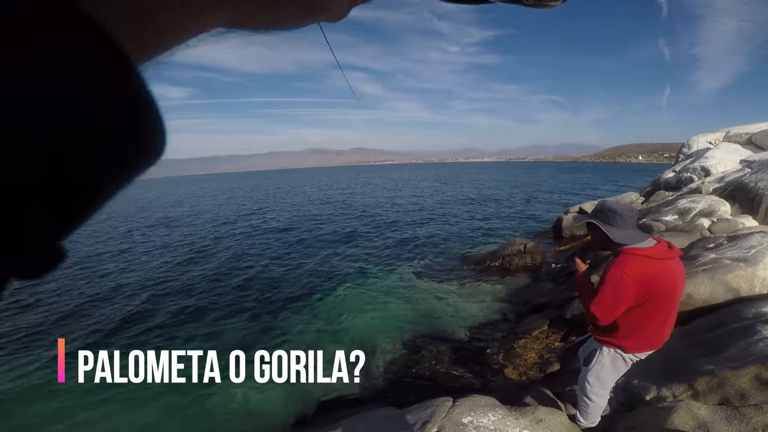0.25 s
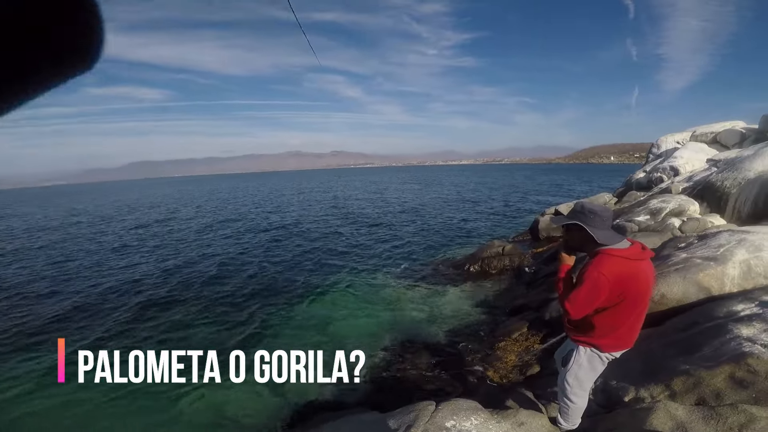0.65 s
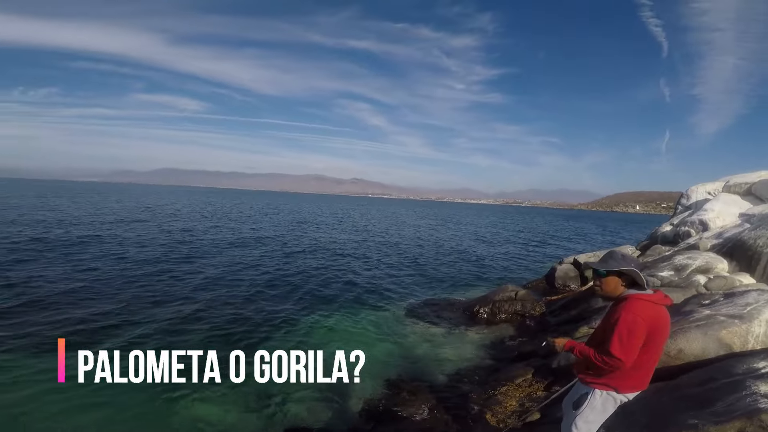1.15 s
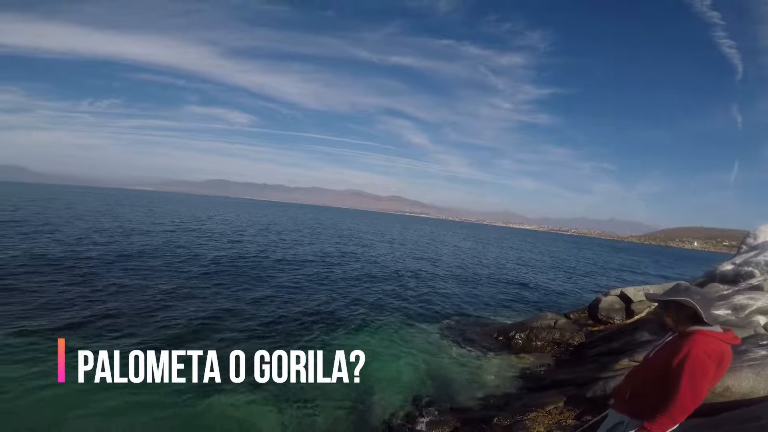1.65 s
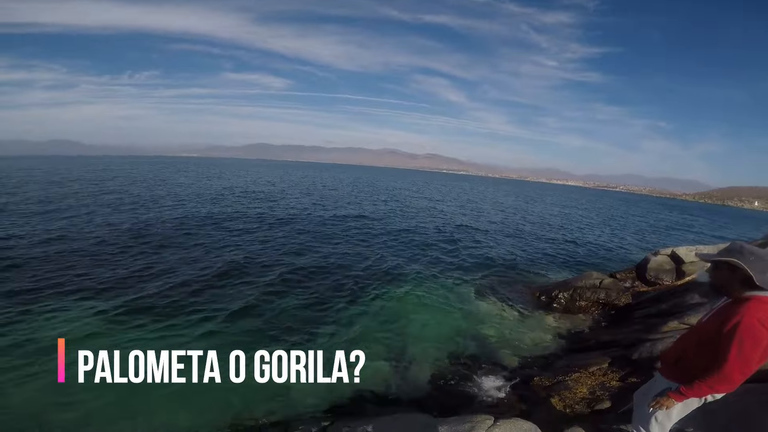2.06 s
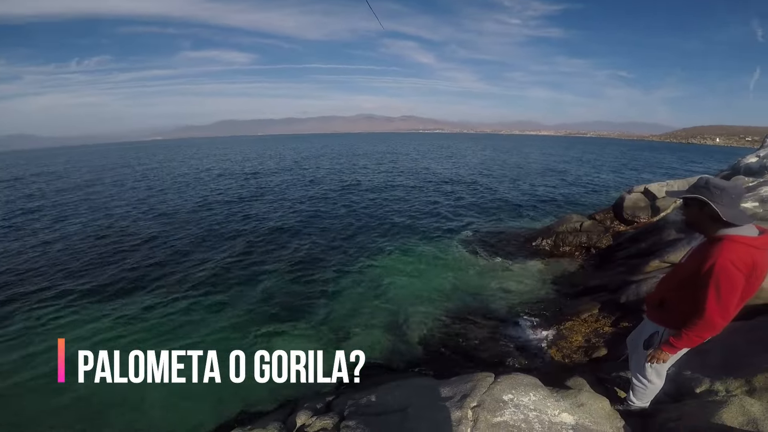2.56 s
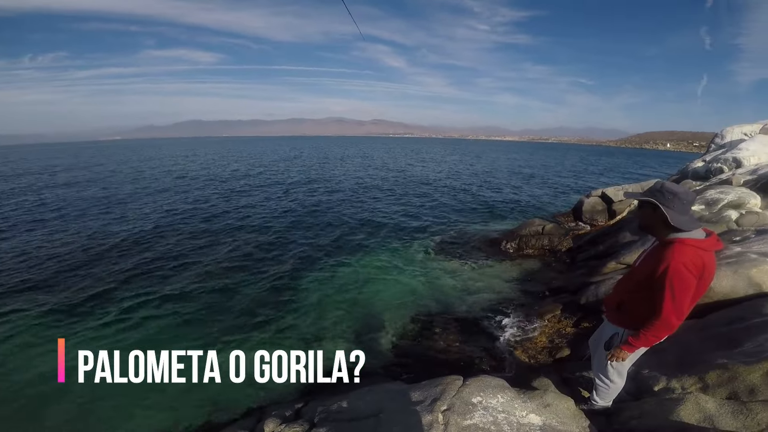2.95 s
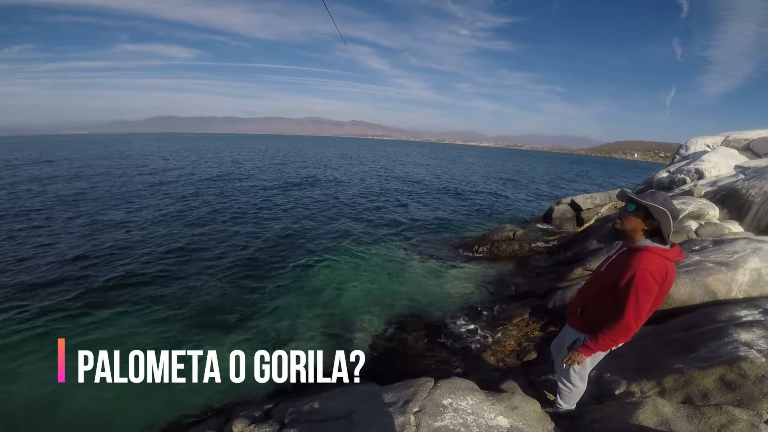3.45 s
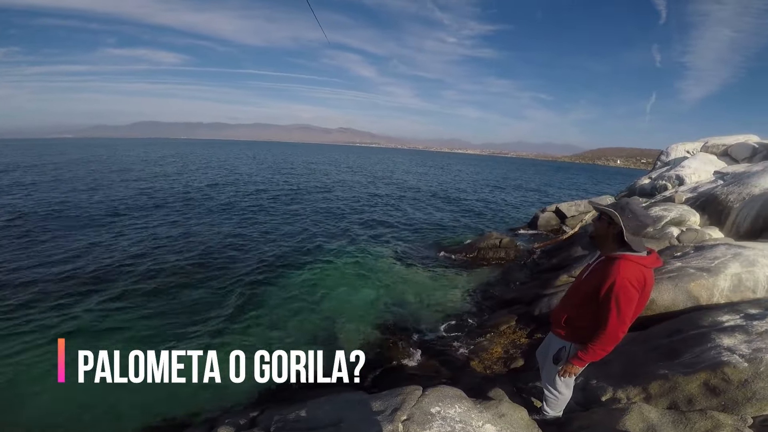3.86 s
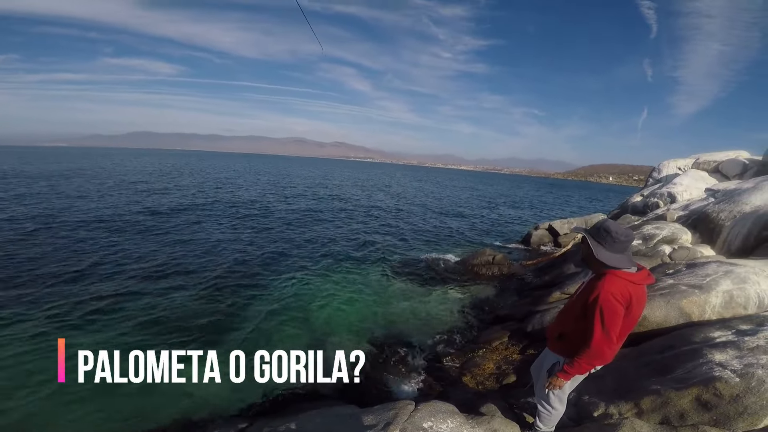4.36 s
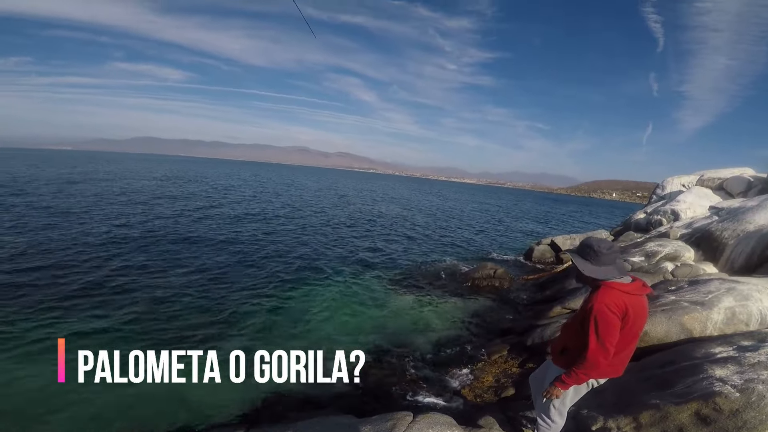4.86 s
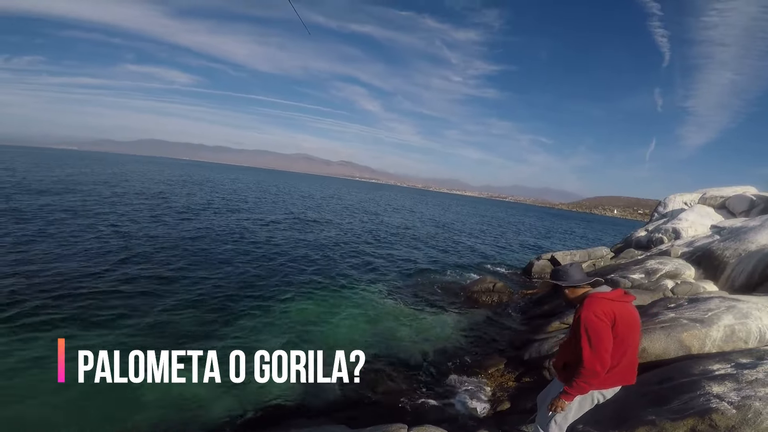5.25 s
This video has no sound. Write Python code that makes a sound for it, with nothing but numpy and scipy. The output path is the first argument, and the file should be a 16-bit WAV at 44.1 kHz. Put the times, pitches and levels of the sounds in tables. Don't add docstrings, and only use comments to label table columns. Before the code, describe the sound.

A fishing reel clicker buzzes as line is dragged out, ticks sporadically, then buzzes long again over gusty wind rumble and washing sea.

```python
import sys
import numpy as np
from scipy import signal
from scipy.fft import rfft, irfft, next_fast_len
from scipy.io import wavfile
from scipy.ndimage import uniform_filter1d

SR = 44100
rng = np.random.default_rng(int(sys.argv[2]) if len(sys.argv) > 2 else 0)


def natural_amplitude(level_db):
    exponent = np.asarray(level_db, float) / 20
    return 10 ** exponent


def wav_out(sig):
    wavfile.write(sys.argv[1], SR, np.round(np.clip(np.atleast_2d(sig).T, -1, 1) * 32767).astype(np.int16))


N = 242972
TIME = np.arange(N) / SR
EARS = np.array([[1], [-1]])
TEETH = 18
EVEN_BELOW_HZ = 6800


def unit(x):
    return x / np.sqrt(np.mean(x ** 2))


def curves(table):
    s, *columns = np.transpose(table)
    return [np.interp(TIME, s, c) for c in columns]


def humps(table):
    return sum(size * np.clip(1 - np.abs(TIME - s) / half_s, 0, 1) for s, size, half_s in table)


def walk(rate_hz, channels=2):
    k = int(SR / rate_hz)
    held = np.repeat(rng.standard_normal((channels, N // 200)), k, axis=1)[:, :N]
    return 2.53 * uniform_filter1d(uniform_filter1d(held, k), k)


def colour(x, points):
    hz, db = np.transpose(points)
    size = next_fast_len(N)
    log_hz = np.log(np.arange(size // 2 + 1) * SR / size + 1e-3)
    gain_db = np.interp(log_hz, np.log(hz), db, left=-90, right=-90)
    return irfft(rfft(x, size) * natural_amplitude(gain_db), size)[..., :N]


def low_pass(x, hz):
    return signal.sosfilt(signal.butter(3, hz, fs=SR, output="sos"), x)


def band_pass(x, order, band_hz):
    return signal.sosfilt(signal.butter(order, band_hz, "band", fs=SR, output="sos"), x)


def ring(pulses, hz, t60_s, lag_rad=0, pan_db=0):
    pole = np.exp(2j * np.pi * hz / SR - np.log(1000) / (t60_s * SR))
    z = signal.lfilter([1], [1, -pole], pulses)
    return np.array([z.imag, (z * np.exp(-1j * lag_rad)).imag]) * natural_amplitude(EARS * pan_db / 2)


def place(s, size):
    pulses, at = np.zeros(N + 1), np.clip(np.asarray(s) * SR, 0, N - 1)
    whole = at.astype(int)
    np.add.at(pulses, whole, size * (1 - at + whole))
    np.add.at(pulses, whole + 1, size * (at - whole))
    return pulses[:N]


# start_s, level_db
WASH = [(0, -53.5), (.75, -49.5), (1.1, -44), (1.65, -42), (2.2, -43.5), (4.4, -43), (4.62, -35),
        (5.2, -35.5), (5.51, -39)]
# freq_hz, level_db_per_hz
SEA_MID = [(410, 12.5), (700, 12), (994, 3), (1280, 7), (1390, 6), (1840, 4.5), (3660, -3.5), (4880, -11),
           (6600, -15.5), (14000, -29.5)]
SEA_SIDE = [(410, -7.5), (700, -4.5), (774, -8), (1450, -9.5), (1640, -17), (1790, -14.5), (4590, -29),
            (7200, -32), (14000, -49)]
# centre_s, gain_db, half_length_s
SLEEVE = [
    (0, 35.5, 0.97),
    (1.47, -1, 0.052),
    (1.92, 14, 0.24),
    (2.33, 13.5, 0.23),
]


def wash():
    swell_db, stroke_db = curves(WASH)[0], humps(SLEEVE)
    ducked = np.interp(TIME, [2.4, 2.5, 4.4, 4.6], [0, 1, 1, 0])
    sea_db = swell_db + 0.62 * stroke_db * (TIME > 1) + 2.0 + 1 * ducked
    rustle_db = swell_db - 8.5 + stroke_db - 22 * ducked + 1.0
    mid, side = (unit(colour(rng.standard_normal(N), shape)) for shape in (SEA_MID, SEA_SIDE))
    flicker = natural_amplitude(1.3 * walk(18))
    sea = (mid + EARS * side) * natural_amplitude(sea_db) * flicker
    grains = rng.standard_normal((2, N)) * natural_amplitude(2.5 * walk(150))
    rustle_shape = [(2500, 5.5), (4500, 1.5), (7000, 11.0), (9000, -0.5), (13500, -15)]
    return sea + unit(colour(grains, rustle_shape)) * natural_amplitude(rustle_db)


# start_s, strength_db, turbulence_db, left_minus_right_db
WIND = [(0.0, -26.5, 12, -4.5), (0.2, -31, -1, -3.5), (0.75, -28, 0, 0.5), (1.0, -21.5, -0.5, -2.5),
        (1.24, -27, 7, -2.5), (1.47, -22.5, -3.5, -1), (1.7, -20.5, -1.5, -1.5), (1.93, -26.5, 9.5, -3),
        (2.1, -18, -3, 5.5), (2.35, -21.5, 2.5, -1), (2.6, -16, -0.5, 4), (2.99, -23.5, -7.5, 0.5),
        (3.45, -21.5, 1, 2.5), (3.9, -16.5, 7, 8), (4.3, -22, 2.5, 1), (4.6, -15.5, 7.5, -11),
        (5.1, -9, -9.5, -13), (5.51, -22.5, -11.5, -2.5)]
# centre_s, gain_db, half_length_s
PUFFS = [(0.52, 6, 0.025), (0.89, 15.5, 0.016), (1.05, 2, 0.055), (1.33, -2, 0.027), (1.4, 6.5, 0.17),
         (1.5, 5.5, 0.058), (2.01, 6, 0.077), (2.19, 5.5, 0.037), (2.47, 1.5, 0.044), (2.8, 7, 0.02),
         (3.22, -9, 0.027), (3.26, 5, 0.034), (3.54, 6.5, 0.017), (3.68, -9, 0.067), (3.77, 0.5, 0.048),
         (4.05, -0.5, 0.039), (4.44, 8.5, 0.068), (4.53, 0, .04), (4.64, 1.5, 0.077), (4.86, 7.5, 0.039),
         (4.93, -2.5, .04), (5.26, 13, 0.02), (5.13, -1, 0.023), (1.22, -2.5, 0.046), (4.26, -1.5, 0.043),
         (3.2, -1.5, .03)]
# centre_s, gain_db, half_length_s
SWIRLS = [(.15, -10, 0.093), (.4, 4, 0.18), (.87, -21, 0.043), (1.25, 8, 0.045), (1.34, -5, 0.016),
          (1.48, 11, 0.052), (1.62, 0, .04), (1.81, 12, 0.041), (2.195, -16, 0.018), (2.36, -5, 0.062),
          (2.97, 4, .08), (3.12, 8, 0.082), (3.62, -8, 0.1), (4.12, 2.5, 0.054), (4.3, 7, 0.055),
          (4.75, 0, 0.087), (4.97, -22, 0.074)]
# freq_hz, level_db_per_hz
EDDY = [(11, -40), (18, -0.5), (59, 1.5), (107, -0.5), (274, -9.5), (432, -17.5), (584, -20), (635, -31),
        (1000, -23.5), (1300, -60), (2200, -120)]


def wind():
    strength_db, turbulence_db, pan_db = curves(WIND)
    puff_db = humps(PUFFS)
    turbulence_db = turbulence_db + humps(SWIRLS)
    rumble_db = strength_db + puff_db
    buffet_db = -7 + 0.64 * turbulence_db + 0.36 * puff_db
    flutter_db = -17.5 + turbulence_db + 0.44 * puff_db
    gust = 1.5 * np.tanh(walk(22.163) / 1.5)
    # low_hz, high_hz, level_db, shared gust_db, each port's own_db
    bands = [(16.0, 126.0, 0.011, 1.5, 1.74),
             (113.5, 390, buffet_db, 3.6, 1.45),
             (307.0, 834, flutter_db, 4, 5.0)]
    out = 0
    for low_hz, high_hz, level_db, gust_db, own_db in bands:
        eddies = colour(rng.standard_normal((2, N)), EDDY)
        band = unit(band_pass(eddies, 2, (low_hz, high_hz)))
        out = out + natural_amplitude(level_db) * unit(band * natural_amplitude(gust_db * gust + own_db * walk(35)))
    return out * natural_amplitude(rumble_db + 1.0 + EARS * pan_db / 2)


# start_s, peak_db, pitch_hz, left_minus_right_db
SLAPS = [(1.432, -2.5, 276, 2), (1.72, -13, 285, -4), (1.895, -22, 505, 7), (2.287, -2.5, 526, 4),
         (2.325, -11, 565, 2), (2.39, -14, 610, 5), (2.5, -9, 285, -10.5), (3.808, -7, 274, 2),
         (4.427, -20, 255, -13), (4.647, -11, 686, 8.5), (4.728, -3.5, 340, -5), (4.847, -11.5, 376, 9),
         (5.064, -11, 759, 4), (5.257, -13.5, 250, 5)]
# start_s, peak_db, pitch_hz
KNOCKS = [
    (1.051, -34, 1820),
    (1.321, -20, 1820),
    (1.3617, -22, 1500),
    (1.405, -25, 1440),
    (1.7193, -25.5, 1750),
    (1.9017, -47, 1600),
]


def handling():
    slaps = sum(ring(place([s], natural_amplitude(db)), hz, 9.0 / hz, 1.32, pan) for s, db, hz, pan in SLAPS)
    knocks, knock_t60_s = 0, .014
    for s, db, hz in KNOCKS:
        rod = ring(place([s], natural_amplitude(db + 13)), hz, knock_t60_s, 2.54)
        seat = ring(place([s], natural_amplitude(db + 6.5)), 1.26 * hz, knock_t60_s, 2.3)
        knocks = knocks + rod + seat
    return low_pass(slaps, 830) + low_pass(knocks, 2100)


# centre_s, speed_lost_share, half_length_s
BINDS = [(.055, .12, .035), (.165, .12, .035), (2.52, .25, .065), (2.662, .2, .04), (2.797, .17, .04),
         (2.932, .28, .052), (3.062, .23, .04), (3.185, .18, .05), (3.315, .13, .04), (3.6, .08, .045),
         (3.68, .07, .04), (3.745, .13, .045), (3.835, .12, .05), (3.872, .06, .035), (3.91, .13, .045),
         (4.0, .1, .03), (4.085, .12, .03), (4.17, .21, .04), (4.255, .08, .05), (4.54, .05, .05)]


def teeth(run):
    rate = curves(run)[0] * (TIME >= run[0][0]) * (TIME < run[-1][0])
    rate *= 1 - humps(BINDS)
    rate *= 1 + .016 * np.sin(4 * np.pi * np.cumsum(rate) / SR / TEETH)
    turns = np.cumsum(rate) / SR / TEETH
    wobble = .03 * (TIME < 1) + .035 * np.clip((TIME - 3.3) * 10, 0, 1)
    fastest_s = 3.53
    rate *= 1 + wobble * np.cos(2 * np.pi * (turns - turns[int(fastest_s * SR)]))
    passed = np.cumsum(rate) / SR
    at = np.flatnonzero(np.diff(np.floor(passed))) + 1
    uneven = .009 * rng.standard_normal(N // 50)[:len(at)]
    return TIME[at] + (uneven - passed[at] % 1) / rate[at], rate[at]


def worn(count):
    turn = 2 * np.pi * np.arange(count) / TEETH
    return natural_amplitude(1.6 * np.sin(turn) + 2.4 * np.sin(2 * turn + 1))


def clicker(s, size, snap, modes, modes_db, snap_s, alike, scatter_db, clean_db, damped_s=9, vary=0.3):
    chance = rng.standard_normal((len(s), len(modes) + 1)).T
    blows = place(s, size * natural_amplitude(scatter_db * chance[-1]))
    release = 30 * uniform_filter1d(blows, size=30, origin=14)
    burst = signal.lfilter([1], [1, -np.exp(-1 / (snap_s * SR))], release)
    common, *own = rng.standard_normal((3, N))
    alike = np.clip(alike, 0, 1)
    noise = np.sqrt(alike) * common + np.sqrt(1 - alike) * np.array(own)
    hiss_shape = [(500, -20), (5000, -17), (6500, -6), (7500, 0), (20000, 0)]
    hiss = natural_amplitude(-27) * colour(burst * noise, hiss_shape)
    knock = natural_amplitude(clean_db) * low_pass(place(s, size), EVEN_BELOW_HZ)
    out = colour(hiss + knock, snap) / np.std(colour(common, snap))
    for c, (hz, db, t60_s, lag_rad, pan_db) in zip(chance, modes):
        strike = np.cbrt(c) if hz > EVEN_BELOW_HZ else 1 + c * vary
        mode = ring(place(s, size * strike), hz, min(t60_s, damped_s), lag_rad, pan_db)
        out = out + natural_amplitude(db + modes_db) * mode
    return out


# start_s, teeth_per_s
RUN_LONG = [(2.405, 152), (2.45, 262), (2.59, 380), (2.73, 432), (3.01, 416), (3.26, 414), (3.47, 436),
            (3.51, 503), (3.955, 500), (4.03, 468), (4.32, 442), (4.35, 385), (4.41, 372), (4.45, 308),
            (4.655, 302), (4.75, 222), (4.88, 216), (4.974, 168)]
# start_s, teeth_passed
COAST_OUT = [(4.9778, 0), (5.0027, 4), (5.0361, 9), (5.0711, 14), (5.1005, 18), (5.1244, 21), (5.1723, 27),
             (5.2062, 31), (5.2402, 35), (5.2791, 39), (5.3105, 42), (5.3439, 45), (5.3833, 48),
             (5.4103, 50), (5.4412, 52), (5.4746, 54), (5.5095, 56)]
# freq_hz, level_db_per_hz
SNAP_SHELTERED = [(1470, -50), (2500, -33), (2980, -44), (4470, -2), (5100, -2), (5700, 8), (6100, -1),
                  (6710, -43), (8380, -37), (9320, -3.5), (10300, -16.5), (12200, -6), (13700, -24),
                  (14800, -15), (15600, -15)]
# pitch_hz, level_db, t60_s, right_lag_rad, left_minus_right_db
SPOOL_SHELTERED = [(3940, -7, 0.078, 0, 0), (4370, 2, 0.014, 0, -1.5), (4700, -3, 0.021, -0.5, -0.5),
                   (7390, -12, 0.06, 0, 0), (5610, -3, 0.013, 0.5, 1), (9500, -4, 0.0091, -0.5, 0),
                   (10800, -14, 0.014, 1, 0), (12100, 1, 0.006, 3, -7), (14650, 7, 0.0076, 1.5, 14)]


def reel_sheltered():
    s, rate = teeth(RUN_LONG)
    rise = np.clip((s - 4.0) / 0.13, 0, 1)
    fast = worn(len(s)) * rise * natural_amplitude(-41.5 + 2.0) * np.sqrt(300 / rate)
    when_s, passed = np.transpose(COAST_OUT)
    tick_s = np.interp(np.arange(passed[-1]), passed, when_s) + 0.0016
    last = natural_amplitude(-35.0) * np.ones(len(tick_s))
    return clicker(np.r_[s, tick_s], np.r_[fast, last], SNAP_SHELTERED, SPOOL_SHELTERED, modes_db=0.33,
                   snap_s=.002, alike=1.0, scatter_db=1.6, clean_db=11.0, damped_s=.06, vary=1.0)


def coast(start_s, gap_s, growth, count):
    gaps = gap_s * growth ** np.arange(count) * (1 + .03 * rng.standard_normal(count))
    return start_s + np.cumsum(gaps) - gaps[0]


# start_s, peak_db, spool_ring_db
TICKS = [(0.6435, -13, -20), (0.6648, -12.5, -23), (0.692, -13, -15), (0.7164, -10, -41), (0.75, -8, -16.5),
         (0.8287, -11, -12.5), (1.429, -15, -21), (1.4635, -14.5, -6), (1.4951, -12.5, -11),
         (1.5217, -9, -35), (1.555, -10.5, -37), (1.59, -13, -21), (1.623, -13.5, -6.5),
         (1.952, -10.5, -24), (1.9979, -9, -19), (2.025, -10.5, -34), (2.044, -11, -33), (2.064, -8, -32),
         (2.093, -9.5, -26), (2.1992, -42, -1), (2.28, -12.5, -18), (2.294, -36, -23), (2.314, -14, -30),
         (2.3296, -10, -21)]


def slow_teeth():
    rows = [np.transpose(TICKS)]
    run_down = coast(start_s=.5317, gap_s=.0072, growth=1.06, count=11)
    start_up = coast(start_s=2.3423, gap_s=.008, growth=1.02, count=8)
    for s, db, ring_db in ((run_down, -10, -18), (start_up, -11.5, -28)):
        chance = rng.standard_normal((len(s), 2)).T
        rows.append([s, db + 2.3 * chance[0], ring_db + 6 * chance[1]])
    return np.concatenate(rows, axis=1)


# low_hz, high_hz
HOUSING_HZ = [
    (1300, 1640),
    (1170, 1800),
]


def housing(push):
    flutter = natural_amplitude(4.5 * np.tanh(walk(45, channels=1)[0] / 2))
    out = 0
    for band_hz, grip in zip(HOUSING_HZ, (TIME < 1, TIME >= 1)):
        body = band_pass(push * grip * flutter, 4, band_hz)
        out = out + np.array([body, 0.41 * np.roll(body, 10)])
    return out


# start_s, teeth_per_s
RUN_OUT = [(0.0, 345), (0.085, 392), (0.13, 386), (0.23, 258), (0.29, 190), (0.365, 250), (0.43, 176),
           (0.5, 198), (0.529, 150)]
# level_db, spool_ring_db, housing_db
GRIPS = [
    (-24, -11.5, 2.5),
    (-25.5, -16.5, -4),
]
# centre_s, gain_db, half_length_s
RIM_FREE = [(0.154, 8, 0.084), (0.55, 0.5, 0.28), (2.45, 2, 0.15), (2.85, 7.5, 0.23), (3.08, -4, 0.1),
            (3.23, 6.5, 0.05), (3.39, -3, 0.073), (3.5, 12, 0.06), (3.78, 3, 0.028)]
# centre_s, gain_db, half_length_s
HUM = [(.03, -4, 0.045), (.11, -3, .04), (.21, 11, 0.014), (.31, 5.5, 0.037), (.42, -2, 0.073),
       (.47, 5, 0.021), (.56, 0, .06), (2.43, -3, .06), (2.57, 2, 0.043), (2.76, 2.5, .04), (2.82, 1, .03),
       (2.92, 2.5, .05), (3.08, 1, 0.037), (3.5, 0.5, 0.053), (3.68, -1, .05), (3.87, -11, 0.054)]
# freq_hz, level_db_per_hz
SNAP = [(1180, -7.5), (2000, -7.5), (2510, -11), (3660, -2), (3820, -4.5), (4140, -39), (4970, -14),
        (5500, 0), (7260, 1.5), (8210, -4), (9370, 0), (11400, -14), (14800, -34), (22000, -120)]
SNAP_EDGE = [(11750, -8)]
# pitch_hz, level_db, t60_s, right_lag_rad, left_minus_right_db
SPOOL_LOW = [(3925, 2.5, 0.32, 0.29, 4), (4020, -9, 0.17, 0.16, -9)]
SPOOL_HIGH = [(4345, -8, 0.032, 0.2, 0.74), (4600, -10.5, 0.019, 0.42, 4.5), (6010, -9, 0.013, 0.2, 25.4),
              (7230, -11, 0.049, 1.6, 4.4), (7418, 0.5, 0.18, 0.89, 2.2), (7200, 7, 0.0088, 1.2, 21),
              (8870, -1, 0.031, 2.4, 0.91), (9470, 7.5, 0.0044, 1.4, 0.6), (10540, -1.5, 0.017, 0.6, 1.5),
              (11320, -5, 0.023, 1, 3), (12400, 0.5, 0.006, 1.7, 2.5), (13800, -5, .006, 1.8, 3),
              (14500, -4.5, 0.0077, 1.3, 9)]
TONGUE = [(4500, -0.5, 0.015, .3, 9)]


def reel_pair():
    level_db, spool_db, housing_db = np.array(GRIPS).T[:, 1 * (TIME >= 1)]
    fading_s = np.maximum(TIME - 3.84, 0)
    level_db = level_db - 8.5 * TIME * (TIME < 1) - 33.5 * fading_s
    spool_db = spool_db + humps(RIM_FREE)
    housing_db = housing_db + humps(HUM) - 14 * fading_s

    s, rate = np.concatenate([teeth(run) for run in (RUN_OUT, RUN_LONG)], axis=1)
    at, wear = (s * SR).astype(int), worn(len(s))
    fast = wear * natural_amplitude(level_db[at] + 1.0) * np.sqrt(300 / rate)
    throb = np.cos(2 * np.pi * (np.arange(len(s)) - 11) / TEETH)
    fast *= natural_amplitude(3 * (s < 1) * throb)
    tick_s, tick_db, ring_db = slow_teeth()

    buzz = clicker(s, fast, SNAP[:-2] + SNAP_EDGE, SPOOL_HIGH, modes_db=0, snap_s=.0024, alike=0.4,
                   scatter_db=2.2, clean_db=23, damped_s=.035, vary=0.33)
    ticks = clicker(tick_s, natural_amplitude(tick_db - 6.0), SNAP, SPOOL_HIGH + TONGUE, modes_db=-12.0, snap_s=0.0016,
                    alike=0.4, scatter_db=1.2, clean_db=10.0)
    out = natural_amplitude(EARS * 0.17) * buzz + ticks
    for (hz, db, t60_s, lag_rad, pan_db), buzz_db in zip(SPOOL_LOW, (4, -16)):
        rub = place(s, fast * natural_amplitude(spool_db[at] + 1.0) * rng.standard_normal(len(s)))
        strike = place(tick_s, natural_amplitude(tick_db + ring_db - 10.5))
        out += natural_amplitude(buzz_db) * ring(rub, hz - 40, .1435, lag_rad, pan_db)
        out += natural_amplitude(db) * ring(strike, hz, t60_s, lag_rad, pan_db)
    fast_push = fast / np.sqrt(wear) * natural_amplitude(housing_db[at] + 36)
    tick_push = natural_amplitude(tick_db + 22 - 18 * (tick_s > .7))
    return out + housing(place(np.r_[s, tick_s], np.r_[fast_push, tick_push]))


# start_s, level_db
PAIR = [(0, 6.5), (4.05, 3.5), (4.4, -7.5), (4.7, -27), (5.1, -29), (5.5, -47)]


def scene():
    pair = natural_amplitude(curves(PAIR)[0])
    air = wash() + wind() + handling()
    one = np.sqrt(1 - np.minimum(pair, 1) ** 2) * air[0]
    return pair * air + 0.54 * one + reel_sheltered() + reel_pair()


# freq_hz, gain_db
STARVED = [(1, 0), (10950, 0), (11100, -40), (11700, -40), (12300, -16), (12600, 0), (13800, 0),
           (13950, -14), (14300, -14), (14450, 0), (15000, 0), (15200, -30), (22100, -30)]


def starve(x):
    early = np.clip((.528 - TIME) * 200, 0, 1)
    return x + early * (colour(x, STARVED) - x)


# low_hz, high_hz, dropped_share
DROPOUTS = [(1820, 1900, .2), (2050, 2150, .3), (2280, 2370, .25), (2480, 2640, .25), (2850, 2940, .3),
            (3600, 3680, .15), (4050, 4170, .4), (4540, 4630, .25), (4860, 5000, .25), (11750, 12300, .72),
            (12850, 13050, .4), (13050, 13250, .45), (13250, 13450, .5), (13450, 13650, .5),
            (13650, 13850, .55), (13850, 14050, .65), (14050, 14220, .65), (15080, 15350, .88),
            (15350, 16500, 1)]
# start_s, end_s, end_s of the very top
DROPOUT_S = (2.45, 4.15, 4.98)


def dropouts(x):
    f, s, z = signal.stft(x, SR, "cosine", nperseg=2048)
    for low_hz, high_hz, share in DROPOUTS:
        gone = np.repeat(rng.random(len(s)) < share, 2)[rng.integers(2):][:len(s)]
        gone &= (s > DROPOUT_S[0]) & (s < DROPOUT_S[1 + (low_hz > 15300)])
        z[:, (f >= low_hz) & (f < high_hz)] *= 1 - gone
    return signal.istft(z, SR, "cosine", nperseg=2048)[1][:, :N]


def band_limit(x):
    return signal.sosfilt(signal.butter(12, 15720, fs=SR, output="sos"), x)


def record(dry):
    soft = np.tanh(0.8 * dry) / 1.108
    thinned = dropouts(starve(soft))
    top = signal.ellip(8, .2, 60, 15750, fs=SR, output="sos")
    return band_limit(signal.sosfilt(top, thinned))


dry = scene()
out = record(dry)
wav_out(out)
```